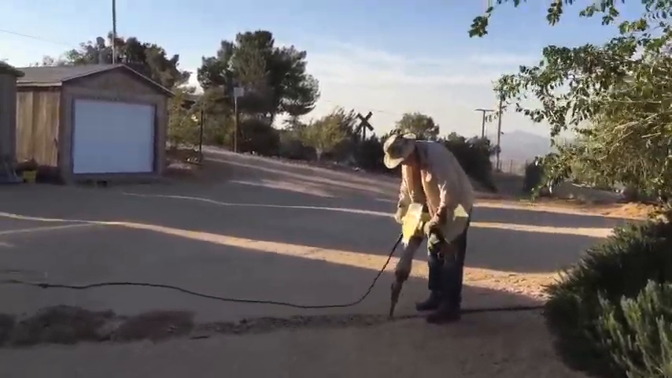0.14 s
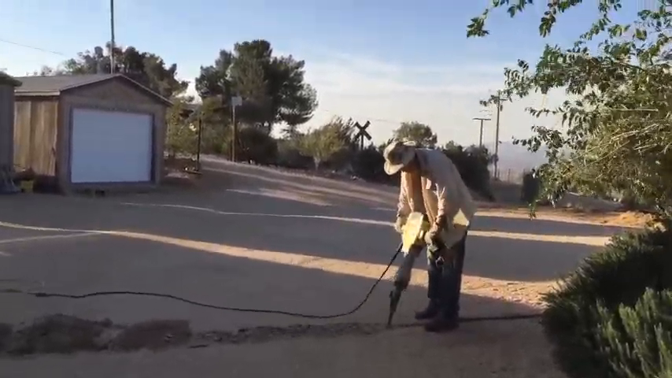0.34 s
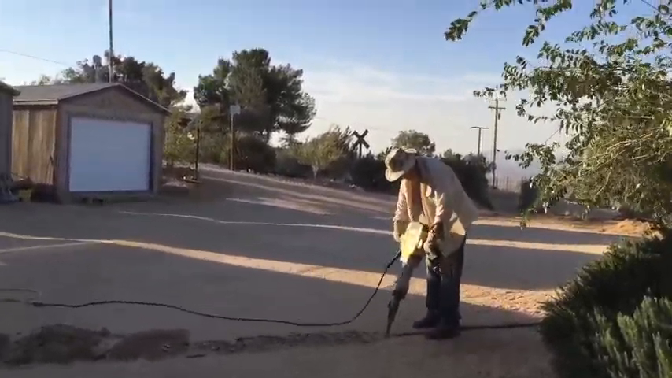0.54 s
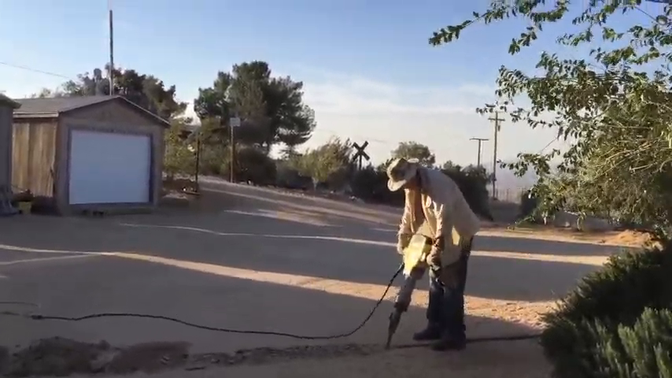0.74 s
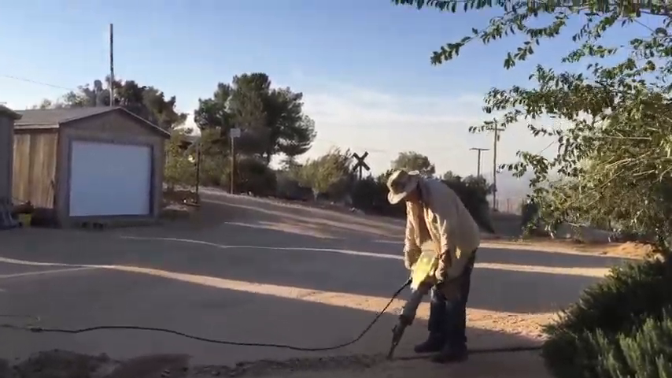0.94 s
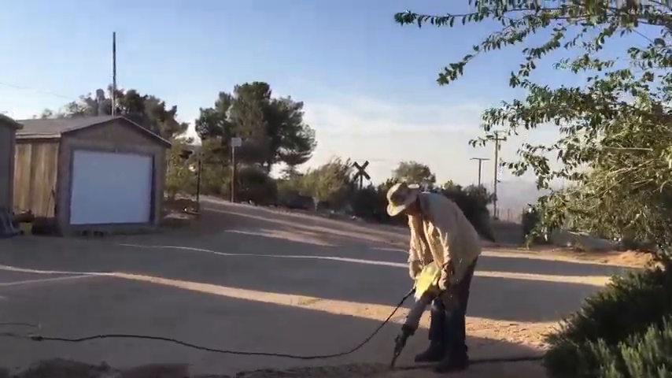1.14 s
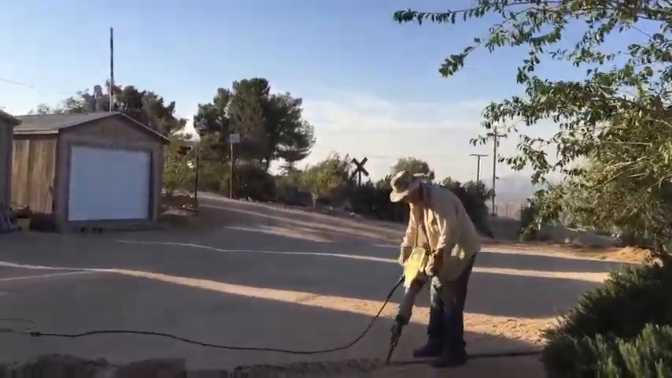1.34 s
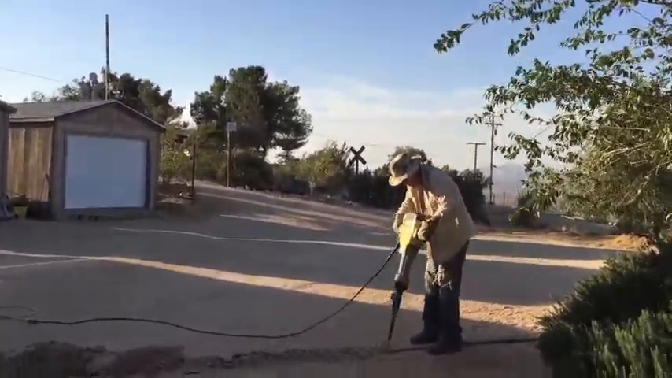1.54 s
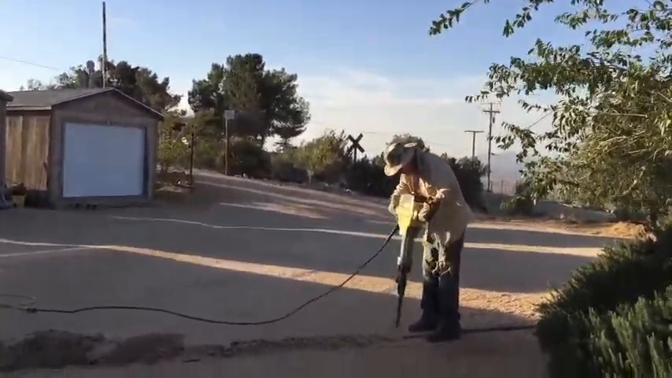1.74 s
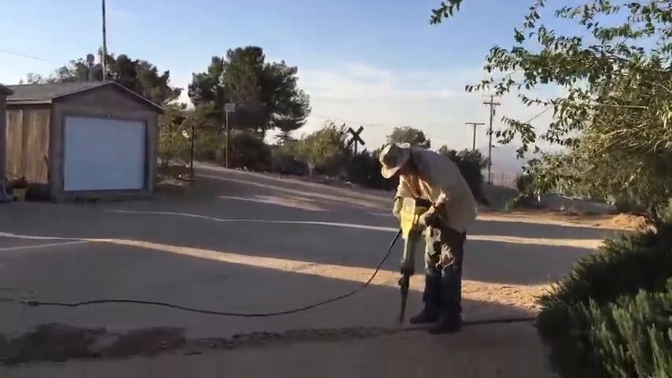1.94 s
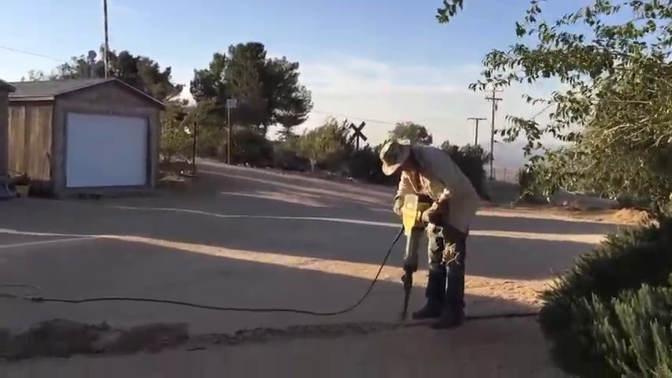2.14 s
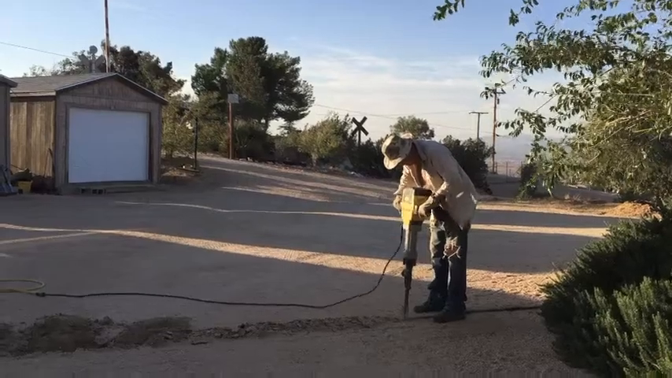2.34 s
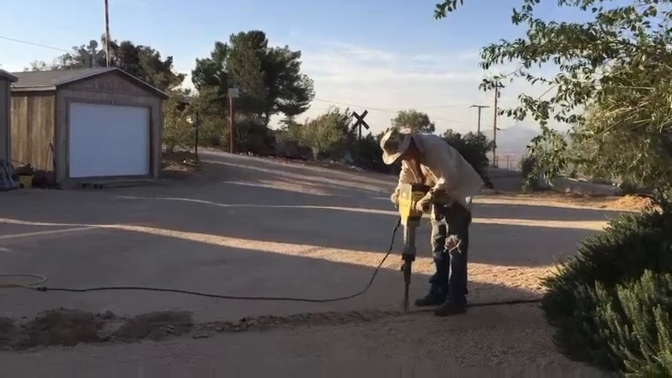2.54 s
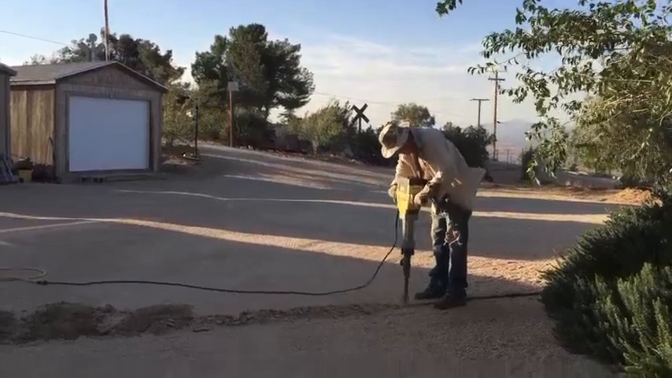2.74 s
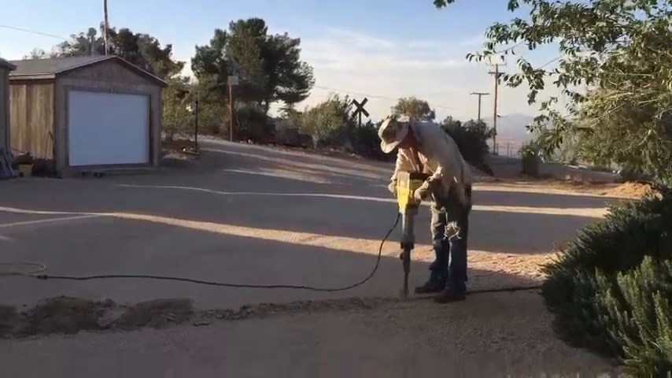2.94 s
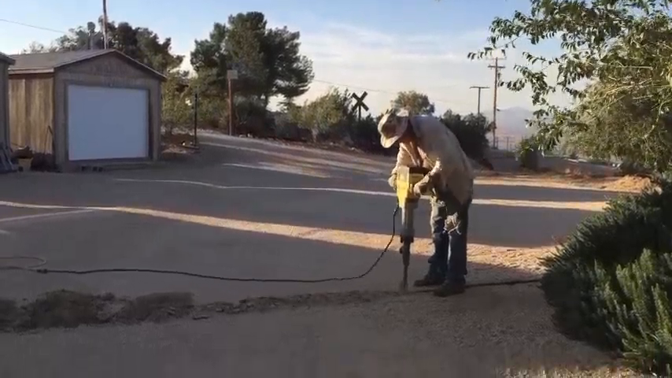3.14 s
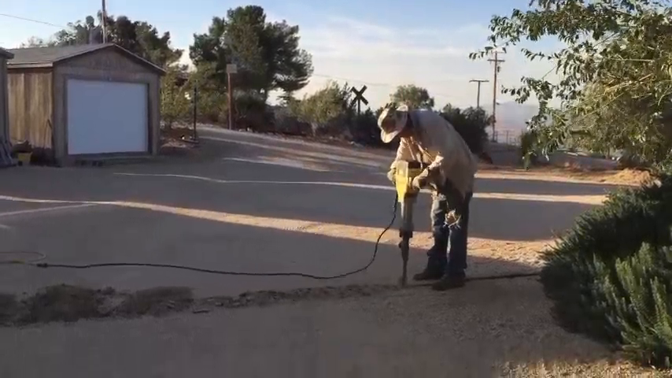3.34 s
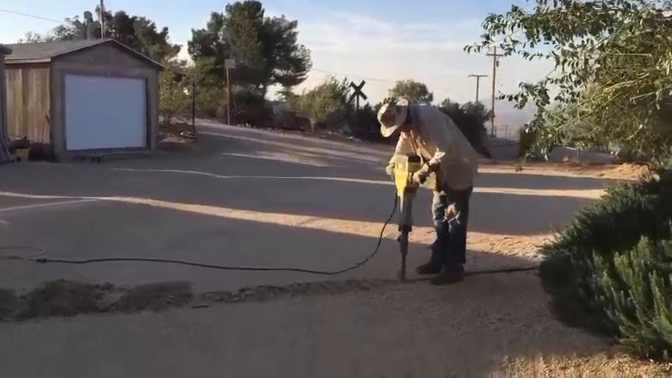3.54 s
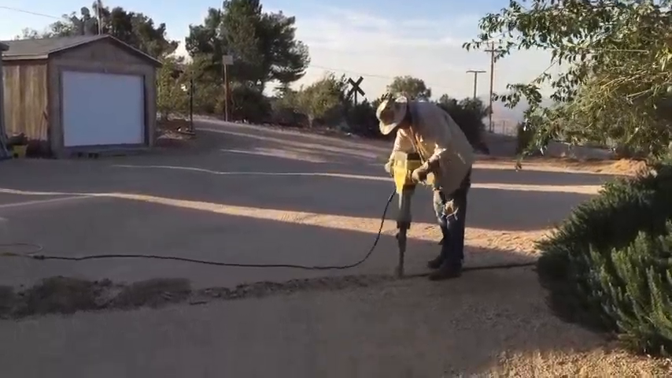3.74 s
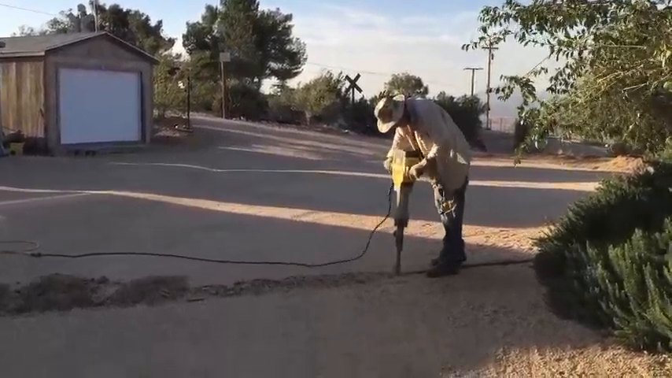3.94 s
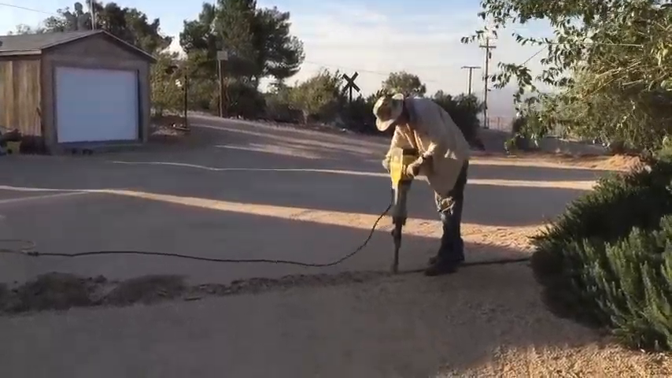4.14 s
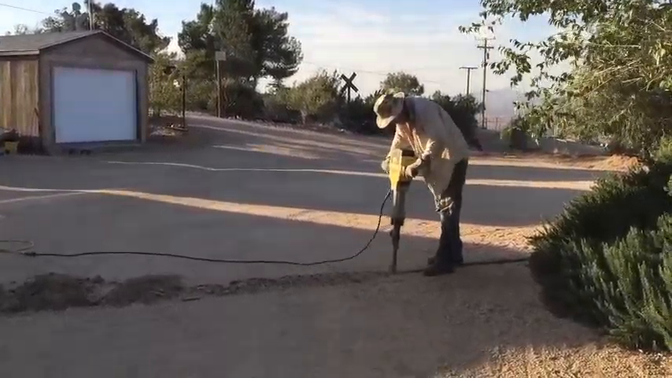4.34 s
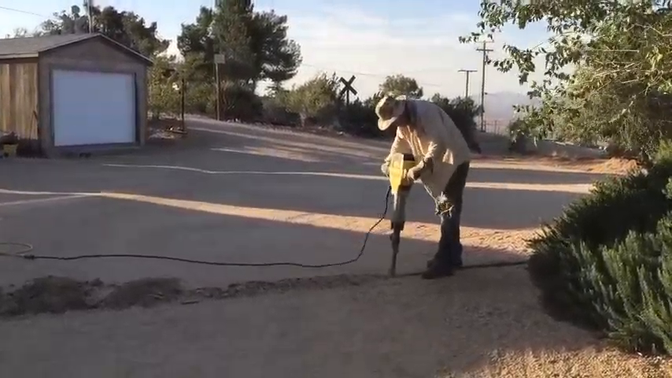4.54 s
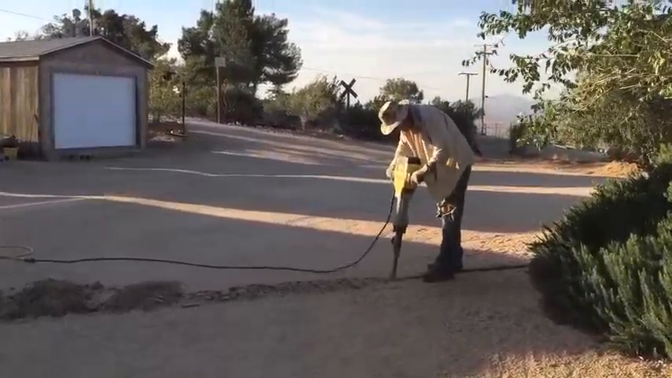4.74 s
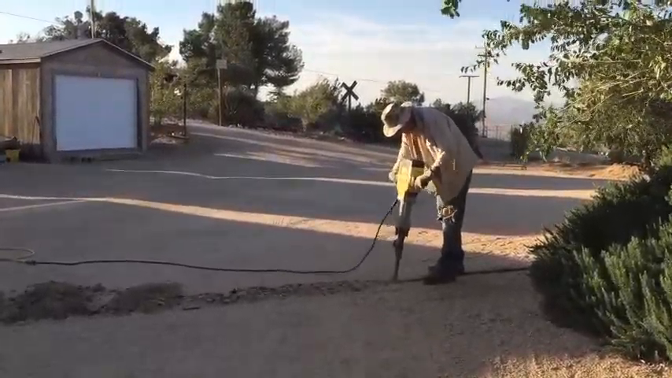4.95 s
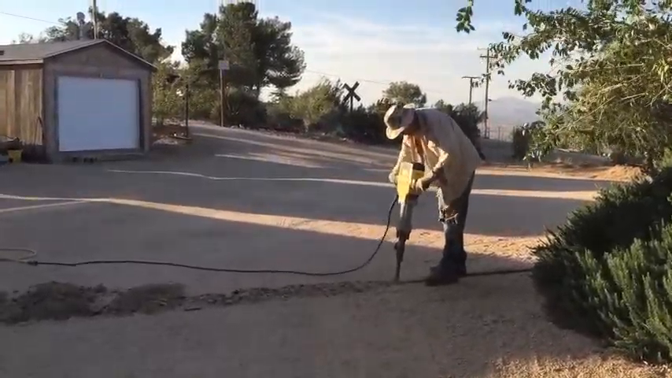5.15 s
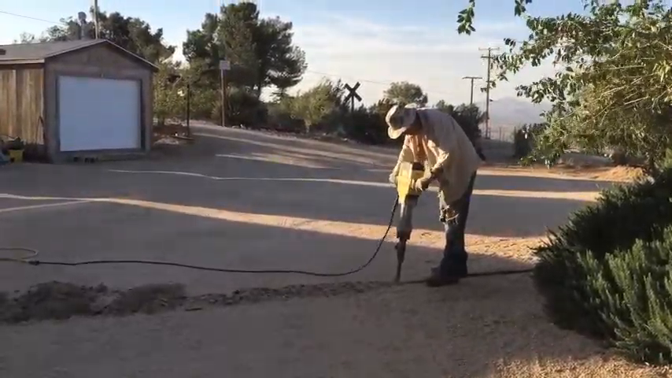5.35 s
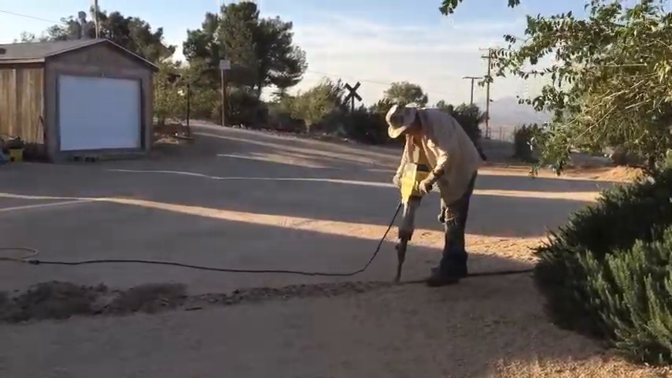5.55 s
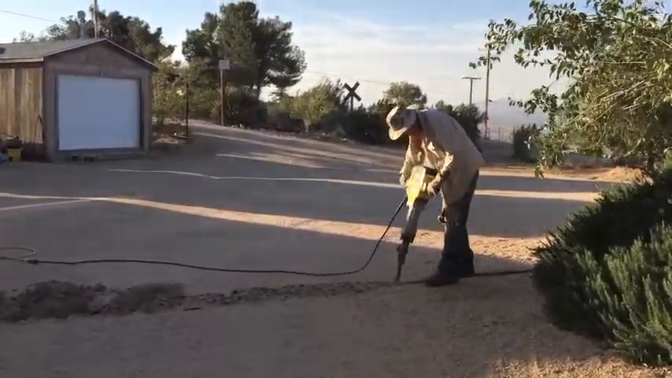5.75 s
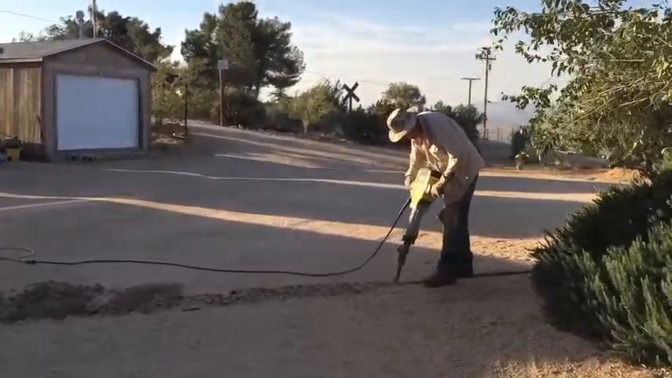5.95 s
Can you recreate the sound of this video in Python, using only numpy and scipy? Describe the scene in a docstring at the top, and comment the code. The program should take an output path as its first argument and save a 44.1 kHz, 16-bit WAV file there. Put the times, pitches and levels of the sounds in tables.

```python
"""Electric jackhammer on packed gravel

About thirteen blows a second; the tool coasts to a stop, restarts with a rattle, runs on and slows again.
Blows are shaped noise for crack and ground, short random sines in each crack, decaying sines for the chisel.
The motor is air noise and hiss plus a gear whine that sags under every compression stroke.
Low noise is wind on the microphone; a weak echo and a faint outdoor background give the open yard."""
import sys
import numpy as np
from scipy import signal
from scipy.fft import rfft, irfft, next_fast_len
from scipy.io import wavfile

SR = 44100
rng = np.random.default_rng(int(sys.argv[2]) if len(sys.argv) > 2 else 0)


def log_audio(samples):
    """Write samples as a 16-bit WAV file to the path given in sys.argv[1]."""
    # one column per channel
    frames = np.atleast_2d(samples).T
    # limit to full scale, then quantise
    limited = np.clip(frames, -1, 1)
    pcm = np.round(limited * 32767).astype(np.int16)
    wavfile.write(sys.argv[1], SR, pcm)


N = 268569
TIME_S = np.arange(N) / SR
AGE_S = TIME_S[:SR // 5]   # time since a contact
MESH_PER_TURN = 126   # gear mesh cycles per crank turn

# All table levels are relative: each source sets its own trim.
# motor noise as heard: (time [s], low air noise level [dB], hiss level [dB])
MOTOR_LEVELS = [(0.02, -32.5, -36), (0.63, -32.5, -39.5), (0.82, -36, -45), (0.96, -37, -50),
                (1.14, -42.5, -62), (1.32, -45.5, -70), (1.41, -46.5, -74), (1.65, -48, -67.5),
                (1.78, -71, -85.5), (1.96, -70, -71.5), (1.98, -29.5, -45), (2.09, -36.5, -53),
                (2.15, -33, -40), (2.7, -37.5, -37), (3.15, -34.5, -35.5), (3.9, -32.5, -43),
                (4.57, -31.5, -38), (5.17, -31, -37.5), (5.77, -32.5, -39.5), (5.95, -35.5, -47),
                (6.06, -38, -49)]
# crank speed before sag and flutter: (time [s], speed [turns/s])
CRANK_SPEED = [(0, 13.3), (.65, 13.2), (.79, 9.5), (.91, 7.0), (1.08, 5.1), (1.31, 3.8), (1.7, .6),
               (1.96, .5), (2.06, 6.5), (2.2, 11.1), (2.38, 12.7), (2.6, 13.3), (5.77, 13.3), (5.83, 11.6),
               (5.93, 9.3), (6.09, 6.6)]
# air noise spectrum: (frequency [Hz], density [dB per Hz])
AIR_COLOUR = [(70, -20.5), (160, 2), (270, -1), (420, -10.5), (560, -6.5), (615, 3), (680, -8.5),
              (1200, 0.5), (1650, -1.5), (2000, -2.5), (2450, 2), (3000, -5), (5800, -1), (7500, -24.5)]
# hiss spectrum: (frequency [Hz], density [dB per Hz])
HISS_COLOUR = [(3000, -7.5), (6500, -2.5), (8000, -5), (10000, -4), (13000, -11), (15500, -16)]
# gear case response to the whine: (frequency [Hz], gain [dB])
GEAR_CASE = [(300, -26), (900, -9), (1650, -1), (2400, 1), (3400, -2), (5000, -5), (6600, 0), (8200, -8),
             (9600, -11), (11400, -12), (14000, -20)]
# wind on the microphone: (time [s], level [dB])
WIND_LEVEL = [(0.0, -48), (0.12, -53), (0.22, -66), (0.3, -44), (0.37, -52), (0.42, -42.5), (0.69, -51),
              (0.75, -49), (0.81, -61), (0.86, -42), (1.03, -79), (1.1, -47), (1.19, -46), (1.25, -64),
              (1.59, -51), (1.8, -70.5), (1.97, -47.5), (2.12, -55), (2.15, -52), (2.31, -50), (2.39, -62),
              (2.53, -42), (2.59, -76), (2.76, -67), (2.81, -50), (3.81, -53.5), (3.95, -42), (4.02, -63),
              (4.14, -45.5), (4.63, -47.5), (4.76, -30.5), (4.82, -55), (4.83, -42), (4.87, -26),
              (4.92, -39), (5.05, -37), (5.11, -51), (5.17, -35), (5.24, -49.5), (5.55, -38), (5.6, -58),
              (5.66, -40), (5.71, -52), (5.94, -38.5), (6.02, -42), (6.09, -65)]
# wind spectrum: (frequency [Hz], density [dB per Hz])
GUST_COLOUR = [(20, -26.5), (50, -6.5), (90, -3), (140, -11), (250, -22), (600, -62)]
# distant outdoor background spectrum: (frequency [Hz], density [dB per Hz])
OUTDOOR_COLOUR = [(60, 5), (200, -18.5), (450, -15.5), (1100, -11.5), (2200, -17.5), (4000, -31.5),
                  (8000, -33.5), (15000, -38.5)]
# blows: (time [s], crack level [dB], ground thud level [dB],
#         ring level of chisel mode families 1, 2, 3, 4 [dB each])
BLOWS = [(0.0473, -12, -24.5, -32, -42, -47, -41), (0.1219, -14.5, -25.5, -39, -32, -26.5, -25),
         (0.1979, -14.5, -26.5, -53, -35, -57, -31), (0.2713, -12, -26, -53, -52, -48, -47),
         (0.348, -17.5, -24, -54, -37, -40, -26), (0.4236, -15, -30.5, -41, -51, -44, -27.5),
         (0.4992, -14, -25, -52, -44, -56, -28), (0.575, -15.5, -24.5, -48, -44, -44, -27),
         (0.6504, -15.5, -22.5, -47, -45, -39, -28), (0.7356, -17, -25, -53, -39, -62, -50),
         (0.8418, -19, -25.5, -55, -36, -55, -60), (0.984, -23.5, -30.5, -57, -54, -62, -56),
         (1.1792, -25.5, -33.5, -40, -33, -61, -48), (1.4408, -29.5, -37, -56, -32.5, -57, -60),
         (1.5372, -22, -30.5, -47, -46, -33, -48), (2.1634, -11, -24.5, -8, -11, -19, -16.5),
         (2.2535, -14, -28.5, -12, -12.5, -15.5, -19), (2.3367, -14.5, -30.5, -20.5, -19, -16.5, -18),
         (2.4144, -38, -37, -15, -17, -31, -19), (2.493, -30, -35.5, -14, -18.5, -33, -21),
         (2.5672, -21.5, -30.5, -20, -22, -33, -23), (2.6436, -20.5, -27.5, -17.5, -28, -26, -20.5),
         (2.716, -14, -29.5, -21, -28, -48, -24), (2.7928, -18.5, -33, -21.5, -35, -31, -21),
         (2.8698, -19, -31, -24, -41, -28, -28), (2.9444, -14, -32, -23, -41, -27, -20),
         (3.0206, -16, -28.5, -20, -33, -32, -24), (3.094, -21, -33, -17.5, -33, -28, -24),
         (3.17, -16.5, -30, -26, -35, -30, -22.5), (3.2439, -15, -30.5, -27, -35, -32, -24.5),
         (3.3185, -14.5, -28.5, -27, -30, -30, -19.5), (3.393, -29, -31.5, -18, -23.5, -31, -20),
         (3.4665, -19, -34.5, -23.5, -28, -33, -19), (3.5426, -15.5, -29, -81, -30, -43, -20.5),
         (3.6162, -16.5, -32, -27, -30, -29, -19), (3.6933, -14, -30, -23, -32, -33, -15),
         (3.7666, -14.5, -33, -23, -25, -28, -18), (3.8414, -12.5, -30, -41, -39, -40, -27),
         (3.9158, -16.5, -32, -21.5, -26, -30, -19), (3.9916, -12, -31, -28, -25, -25.5, -20.5),
         (4.0673, -16, -30, -33, -23, -52, -20.5), (4.1411, -16, -30.5, -27.5, -27.5, -37, -26.5),
         (4.2162, -13, -28, -29, -23.5, -29, -20.5), (4.2915, -14, -28, -30, -28, -40, -16),
         (4.3655, -17.5, -27, -44, -35, -54, -23.5), (4.4401, -14, -24, -46, -44, -43, -33),
         (4.514, -13.5, -26.5, -48, -31, -55, -32), (4.5888, -14.5, -29, -50, -48, -29.5, -25),
         (4.6635, -14, -28.5, -51, -25.5, -29, -28), (4.7365, -15, -28, -40, -30, -52, -39),
         (4.8107, -18.5, -28.5, -29, -18.5, -53, -29), (4.887, -12.5, -29, -48, -25, -33, -26.5),
         (4.9624, -14, -26, -47, -34, -32, -29), (5.0366, -12, -24.5, -48, -24, -29, -55),
         (5.1122, -15, -24.5, -44, -27, -28, -31), (5.1852, -12.5, -24.5, -49, -26, -49, -29),
         (5.261, -10, -24.5, -50, -26, -38, -44), (5.338, -12.5, -30, -53, -34, -52, -32),
         (5.4107, -13.5, -26, -51, -22.5, -26.5, -32), (5.4867, -13.5, -31.5, -49, -38, -30, -24),
         (5.562, -15.5, -27, -39, -27.5, -30, -27.5), (5.6369, -16.5, -26.5, -36, -20.5, -25, -28),
         (5.712, -14, -29, -53, -24, -27, -22.5), (5.7887, -14.5, -25.5, -49, -30, -37, -25),
         (5.874, -15, -24, -53, -30, -55, -44), (5.9828, -17.5, -27, -47, -34, -54, -49)]
# steel crack spectrum, shared by the scrape: (frequency [Hz], density [dB per Hz])
CRACK_COLOUR = [(1500, -31), (2300, -13), (2750, -16), (3150, 3), (3900, -5), (4500, 9.5), (5000, -2.5),
                (6000, 1), (7200, -9.5), (8300, -5), (12000, -9.5), (15800, -10)]
# ground thud spectrum: (frequency [Hz], density [dB per Hz])
THUD_COLOUR = [(70, -42), (160, -8), (260, -4.5), (480, -10.5), (750, -6.5), (1150, -0.5), (1550, 2),
               (2100, -5), (3200, -4)]
# chisel modes, one list per family that rings together: (frequency [Hz], level [dB], t60 [s])
CHISEL_FAMILIES = [
    [(4229, 0, .4), (3138, -18, .15), (3542, -20, .15), (7833, -14, .25), (8570, -20, .25),
     (9103, -14, .25)],
    [(4651, 0, .5), (4695, -14, .15), (6550, -20, .25), (12080, -25, .2)],
    [(5211, 0, .4), (5675, -8, .3), (5770, -14, .15), (7478, -17, .3)],
    [(10012, 0, .24), (10573, -20, .2), (10920, -12, .25), (12872, -19, .2), (13776, -17, .25),
     (14703, -16, .25), (14900, -23, .2), (15700, -25, .2)],
]
# tool body dropping on the ground: (time [s], level [dB])
TOOL_DROPS = [(0.736, -23), (.844, -22), (0.865, -24.5), (0.985, -47)]
# loose chisel rattle as the motor starts: (time [s], level [dB])
RATTLE_LEVEL = [(1.955, -70), (1.972, -48), (1.978, -26), (2.008, -22), (2.03, -28), (2.055, -32.5),
                (2.09, -52), (2.12, -90)]
# chisel holder modes: (frequency [Hz], level [dB], t60 [s])
HOLDER_MODES = [(2093, -7, 0.066), (4450, 0, 0.022), (5560, 1, 0.02), (5710, 4.5, 0.044), (7070, -8, 0.16),
                (9200, -6.5, 0.11), (10100, -25, .05), (10950, -29, .05)]


def from_db(db):
    """Decibels to gain."""
    return 10 ** (np.asarray(db) / 20)


def rms_one(x):
    """Scale to rms 1."""
    return x / np.sqrt(np.mean(x ** 2) + 1e-20)


def in_time(rows):
    """Interpolate each column of a time table at every sample."""
    time_s, *columns = np.transpose(rows)
    return [np.interp(TIME_S, time_s, column) for column in columns]


def coloured(x, colour):
    """Filter by a spectral curve with 12 dB/octave skirts; rms 1."""
    hz, db = np.transpose(colour)
    size = next_fast_len(N)
    f_hz = np.maximum(np.fft.rfftfreq(size, 1 / SR), 1)
    skirts = np.minimum(1, f_hz / hz[0]) ** 2 * np.minimum(1, hz[-1] / f_hz) ** 2
    gain = from_db(np.interp(np.log(f_hz), np.log(hz), db)) * skirts
    return rms_one(irfft(rfft(x, size) * gain, size)[:N])


def noise(colour):
    """Steady noise of a given colour, rms 1."""
    return coloured(rng.standard_normal(N), colour)


def low_pass(x, cutoff_hz):
    """Second-order low-pass."""
    return signal.sosfilt(signal.butter(2, cutoff_hz, fs=SR, output="sos"), x)


def flutter(knots_per_s):
    """Random wobble: straight lines between normal random knots."""
    knots = rng.standard_normal(N // 10)
    return np.interp(TIME_S * knots_per_s, np.arange(len(knots)), knots)


def fade(t_s, t60_s):
    """Exponential decay, 60 dB in t60_s, starting at t = 0."""
    return np.exp(-np.log(1000) * np.maximum(t_s, 0) / t60_s)


def burst(delay_s, rise_s, hold_s, t60_s):
    """Envelope of one contact: rise, hold, decay."""
    t_s = np.maximum(AGE_S - delay_s, 0)
    return (1 - np.exp(-t_s / rise_s)) * fade(t_s - hold_s, t60_s)


def add(track, time_s, sound):
    """Mix a sound into a track at time_s."""
    i = max(int(time_s * SR), 0)
    track[i:i + len(sound)] += sound[:N - i]


def motor(hiss_trim_db=-3, slow_air_hz=2600, churn_db=2.5):
    """Air noise, hiss and gear whine; the air is duller and the whine blurred at low speed."""
    air_db, hiss_db = in_time(MOTOR_LEVELS)
    speed, = in_time(CRANK_SPEED)
    slowness = np.clip(1 - speed / np.max(speed), 0, 1)
    dull_air = low_pass(noise(AIR_COLOUR), slow_air_hz)
    bright_share = 1 - slowness
    dull_share = np.sqrt(1 - bright_share ** 2)
    air = bright_share * noise(AIR_COLOUR) + dull_share * dull_air
    air = air * from_db(churn_db * flutter(120))
    whine = from_db(air_db - 5 + 2 * slowness) * gear_whine(speed, slowness)
    hiss = from_db(hiss_db + hiss_trim_db) * noise(HISS_COLOUR)
    return from_db(air_db - 1.5) * air + whine + hiss


def gear_whine(speed, slowness):
    """Compressing the air cushion before each blow slows the gears and presses their teeth hard together."""
    blow_s = np.array(BLOWS)[:, 0]
    # one extra blow at each end, at the neighbouring interval
    blow_s = np.r_[2 * blow_s[0] - blow_s[1], blow_s, 2 * blow_s[-1] - blow_s[-2]]
    stroke = np.interp(TIME_S, blow_s, np.arange(len(blow_s)))
    sag = .065 * (1 - slowness) * np.cos(2 * np.pi * (stroke - .55))
    mesh_hz = MESH_PER_TURN * speed * (1 + sag + .008 * flutter(700))
    mesh_phase = 2 * np.pi * np.cumsum(mesh_hz) / SR
    load = (1 - slowness) * np.exp(8 * (np.cos(2 * np.pi * (stroke - .83)) - 1))
    # teeth grind roughly under starting torque
    spinning_up = slowness * (np.gradient(speed) > 0)
    blur_depth = .55 + 1.1 * slowness + 1.5 * spinning_up
    out = 0
    for order in np.arange(1, 17) / 2:
        # whole orders come from the mesh, half orders from uneven teeth; slack teeth rattle and blur both
        if order % 1 == 0:
            strength = load + .55 / order ** 1.5
        else:
            strength = .25 / (order + .5)
        tone = np.sin(order * mesh_phase + blur_depth * flutter(160))
        out = out + from_db(4 * flutter(70)) * (strength + .35 * slowness) * tone
    return coloured(out, GEAR_CASE)


def wind():
    """Low-frequency noise of gusts on the microphone."""
    level_db, = in_time(WIND_LEVEL)
    return from_db(level_db - 1) * noise(GUST_COLOUR)


def outdoors(level_db=-60.5):
    """Steady, faint noise of the distant background."""
    return from_db(level_db) * noise(OUTDOOR_COLOUR)


def impacts(rebound_s=0.022, crack_rebound_db=-15, thud_rebound_db=-7, strike_db=3, grit_db=-15,
            grain_db=1.5, crumble_db=3):
    """Each blow is a steel crack and a thud in the ground; gravel crunches and the striker bounces back."""
    crack, thud = np.zeros(N), np.zeros(N)
    strike = burst(0, rise_s=.0001, hold_s=.0015, t60_s=.038)
    crunch = burst(0, rise_s=.002, hold_s=.008, t60_s=.1)
    push = burst(0, rise_s=0.00081, hold_s=0.0034, t60_s=0.076)
    for time_s, crack_db, thud_db, *_ in BLOWS:
        late, hard = rng.standard_normal(2)
        bounce = burst(rebound_s + .002 * late, rise_s=.001, hold_s=.005, t60_s=.06)
        bounce = from_db(1.5 * hard) * bounce
        contacts = [from_db(strike_db) * strike, from_db(grit_db) * crunch, from_db(crack_rebound_db) * bounce]
        # envelopes of independent contacts add in power
        add(crack, time_s, from_db(crack_db) * np.linalg.norm(contacts, axis=0))
        add(thud, time_s, from_db(thud_db + 4.5) * np.hypot(push, from_db(thud_rebound_db) * bounce))
    grains = rms_one(from_db(grain_db * flutter(1500)))
    lumps = rms_one(from_db(crumble_db * flutter(250)))
    return crack * grains * noise(CRACK_COLOUR) + thud * lumps * noise(THUD_COLOUR)


def crack_partials(count=16, partial_db=-11):
    """Scattered metallic partials: short decaying sines of random pitch and delay vary each crack."""
    out = np.zeros(N)
    for time_s, crack_db, *_ in BLOWS:
        for pitch, wait, size in rng.random((count, 3)):
            hz = 2200 + 13000 * pitch ** 1.3
            delay_s = -.007 * np.log(1 - wait)   # exponential, mean 7 ms
            level = from_db(crack_db + partial_db + 10 * (size - .5)) * fade(delay_s, .1)
            partial = np.sin(2 * np.pi * hz * AGE_S) * fade(AGE_S, .03)
            add(out, time_s + delay_s, level * partial)
    return out


def chisel(typical_hold_s=0.044, after_db=-31, ring_db=4, scatter_db=5.0, waver=.28):
    """Steel modes: each blow's ring holds for about 40 ms, then falls quickly to a faint remainder."""
    out = np.zeros(N)
    onset = 1 - np.exp(-AGE_S / .0002)
    for time_s, _, _, *family_db in BLOWS:
        # louder rings hold longer
        hold_s = typical_hold_s * from_db(.12 * (max(family_db) + 22) + rng.standard_normal())
        envelope = onset * (np.exp(-(AGE_S / hold_s) ** 3) + from_db(after_db) * fade(AGE_S, .3))
        for level_db, family in zip(family_db, CHISEL_FAMILIES):
            hz, mode_db, t60_s = np.transpose(family)[:, :, None]
            luck_db = scatter_db * rng.standard_normal(hz.shape)
            luck_db[0] = 0   # the leading mode keeps its level
            hz = hz * (1 + .0006 * rng.standard_normal(hz.shape))
            modes = np.sin(2 * np.pi * (hz * AGE_S + rng.random(hz.shape))) * fade(AGE_S, t60_s)
            ring = np.sum(from_db(level_db + ring_db + mode_db + luck_db) * modes, axis=0)
            add(out, time_s, envelope * ring)
    return out * (1 + waver * flutter(500))   # the ring wavers slightly in loudness


def earth_punches(centre_hz=235, t60_s=.03, trim_db=-4):
    """Every blow punches the packed earth: a short low sine of slightly varying pitch."""
    out = np.zeros(N)
    envelope = burst(0, rise_s=.002, hold_s=0.0048, t60_s=t60_s)
    for time_s, _, thud_db, *_ in BLOWS:
        hz = centre_hz * from_db(rng.standard_normal())
        punch = np.sin(2 * np.pi * hz * AGE_S) * envelope
        add(out, time_s, from_db(thud_db + trim_db) * punch)
    return out


def tool_drops(hz=165, t60_s=0.047):
    """As the blows slow, the whole heavy tool drops onto the ground: short low sines."""
    out = np.zeros(N)
    drop = np.sin(2 * np.pi * hz * AGE_S) * burst(0, rise_s=0.0039, hold_s=0.0044, t60_s=t60_s)
    for time_s, level_db in TOOL_DROPS:
        add(out, time_s, from_db(level_db) * drop)
    return out


def start_rattle(clicks_per_s=400, scrape_db=-8):
    """The loose chisel chatters and scrapes in its holder: random clicks excite the holder's modes."""
    clicks = (rng.random(N) < clicks_per_s / SR) * rng.standard_normal(N) + 1e-18
    chatter = 0
    for hz, mode_db, t60_s in HOLDER_MODES:
        radius = fade(1 / SR, t60_s)
        angle = 2 * np.pi * hz / SR
        resonator = [1, -2 * radius * np.cos(angle), radius * radius]
        chatter = chatter + from_db(mode_db) * rms_one(signal.lfilter([1], resonator, clicks))
    level_db, = in_time(RATTLE_LEVEL)
    scrape = from_db(scrape_db + 3 * flutter(300)) * noise(CRACK_COLOUR)
    started = TIME_S > RATTLE_LEVEL[0][0]
    return from_db(level_db) * (rms_one(chatter) + scrape) * started


def yard(x, echo_db=-19, t60_s=0.38, dull_hz=4500):
    """Weak, dull scatter from the shed, bushes and ground: a decaying noise tail."""
    t_s = TIME_S[:SR // 2]
    tail = rng.standard_normal(len(t_s)) * fade(t_s, t60_s) * (1 - np.exp(-t_s / 0.0081))
    tail = low_pass(tail / np.linalg.norm(tail), dull_hz)
    return x + from_db(echo_db) * signal.fftconvolve(x, tail)[:N]


def scene():
    """The hammer in the yard, with wind rumble and a faint background."""
    blows = impacts() + crack_partials() + chisel() + earth_punches()
    hammer = motor() + blows + tool_drops() + start_rattle()
    return (yard(hammer) + wind() + outdoors())[None]


def record(dry, ceiling=.78, cutoff_hz=15900):
    """Round the loudest peaks and cut the top."""
    rounded = dry / (1 + (dry / ceiling) ** 4) ** .25
    return signal.sosfilt(signal.ellip(8, .2, 70, cutoff_hz, fs=SR, output="sos"), rounded)


dry = scene()
out = record(dry)
log_audio(out)
```